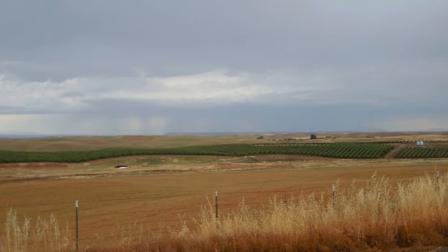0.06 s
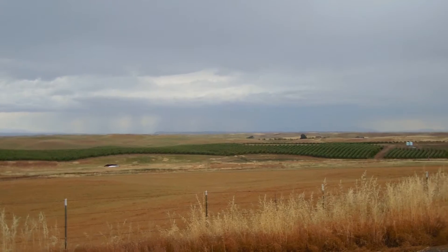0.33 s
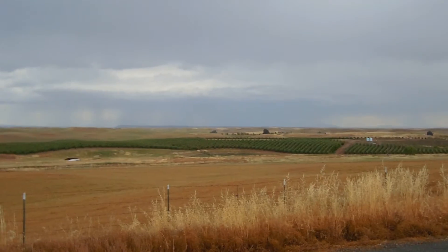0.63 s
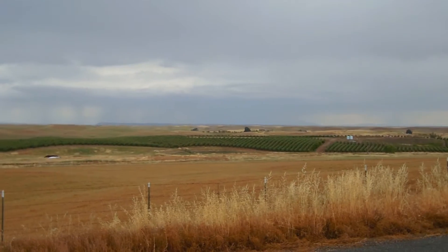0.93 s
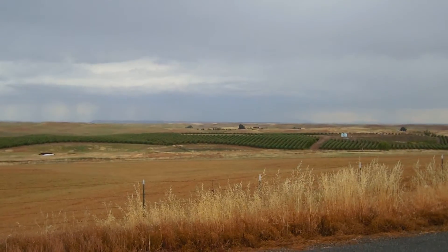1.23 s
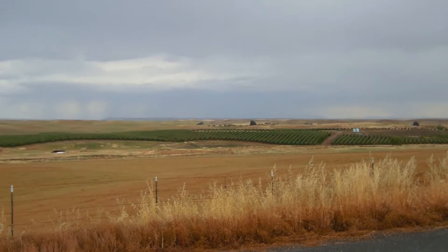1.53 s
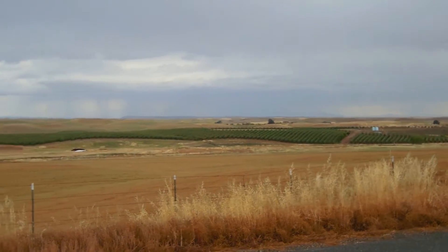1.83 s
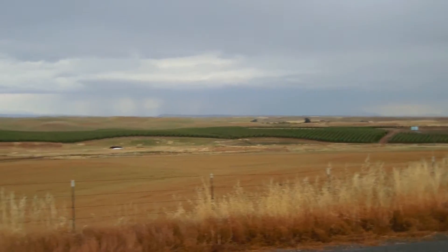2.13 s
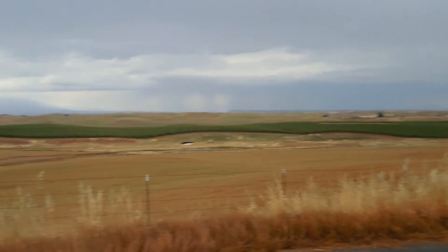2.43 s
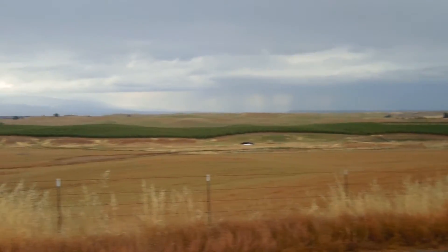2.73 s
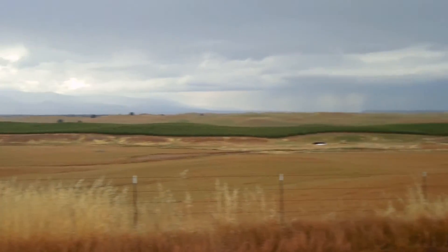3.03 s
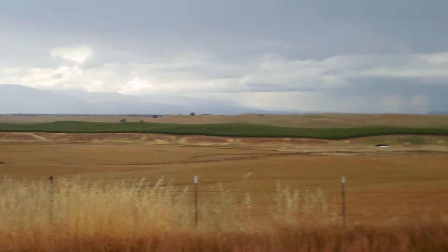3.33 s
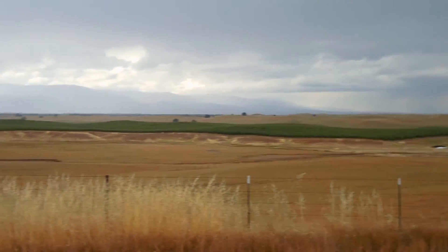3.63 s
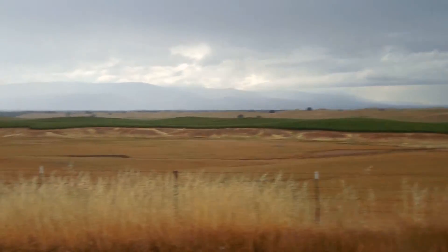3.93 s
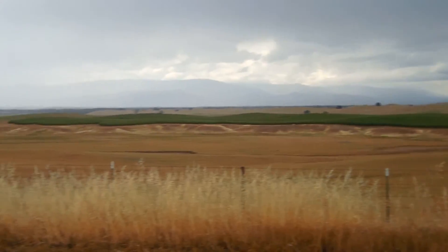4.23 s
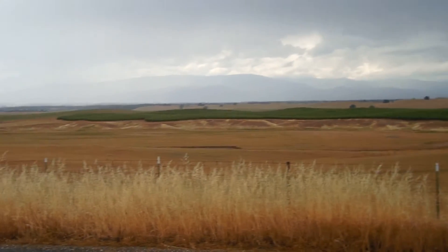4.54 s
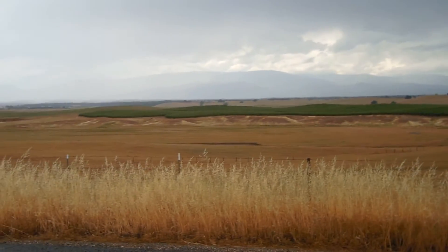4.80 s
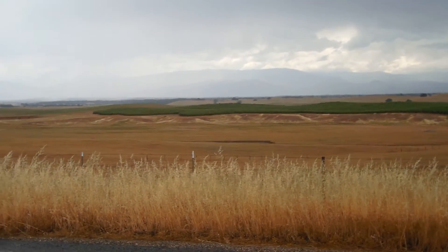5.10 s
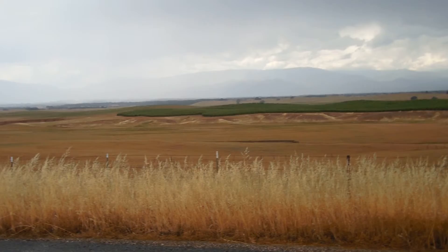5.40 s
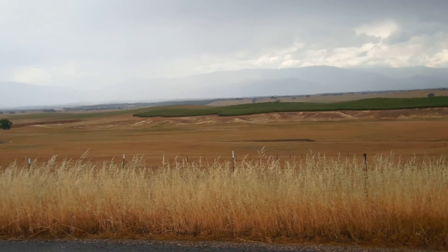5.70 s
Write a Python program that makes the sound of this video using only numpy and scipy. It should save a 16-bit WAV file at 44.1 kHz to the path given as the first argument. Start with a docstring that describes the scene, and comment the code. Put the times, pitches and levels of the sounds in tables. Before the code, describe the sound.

Light wind puffs on the microphone in an open field, strongest at the very start on the right, where dry grass stalks briefly hiss. From about 0.3 to 0.9 seconds a songbird close on the right sings three clear whistles, the last one lower. It runs straight into a fast, gurgling warble of chips and high swoops, ending with a fading whistle at 1.5 to 1.7 seconds. This song is the loudest sound. The hand-held camera gives small, dull clicks on the left at about 0.7, 1.4 and 2.1 seconds, with soft rubbing until 2.8. Grass rustles faintly between 2 and 3 seconds and briefly later. At 3.4 seconds a distant bird answers quietly with two falling whistles, then quick chips from 4 to 4.4 and a very faint call near 5.3. Soft wind, low hiss and a faint camera whir continue throughout.

```python
"""A songbird close on the right sings four pure whistles and a fast, gurgling warble of chips and high
swoops, all tones from the membranes of its syrinx. A far bird answers; the field scatters both songs.
Light wind puffs on the two microphone ports and dry grass rustles. The hand-held camera whirs faintly
and is rubbed and bumped a few times."""
import sys
import numpy as np
from scipy import signal
from scipy.fft import rfft, irfft, next_fast_len
from scipy.io import wavfile
from scipy.ndimage import uniform_filter1d, map_coordinates

SR = 44100
rng = np.random.default_rng(int(sys.argv[2]) if len(sys.argv) > 2 else 0)


def int16_out(signal):
    """Quantize to a 16-bit WAV file."""
    q = np.round(np.clip(np.atleast_2d(signal).T, -1, 1) * 32767)
    wavfile.write(sys.argv[1], SR, q.astype(np.int16))


N = 254016


def amp(db):
    """Decibels to gain."""
    return 10 ** (np.asarray(db) / 20)


def unit_rms(x):
    """Scale to rms 1."""
    return x / np.sqrt(np.mean(x ** 2) + 1e-20)


def log_interp(points, hz):
    """Read (f/Hz, value) points on a log frequency axis."""
    knots_hz, values = np.transpose(points)
    return np.interp(np.log(hz + 1), np.log(knots_hz + 1), values)


def wobble(rate_hz, size=N):
    """Smooth random curve with knots at rate_hz."""
    knots = rng.standard_normal(int(size * rate_hz / SR) + 4)
    return map_coordinates(knots, [np.arange(size) * rate_hz / SR], mode="mirror")


def filtered(x, response):
    """Apply a frequency response."""
    size = next_fast_len(N + 8192)
    return irfft(rfft(x, size) * response(np.fft.rfftfreq(size, 1 / SR)), size)[..., :N]


def noise(density):
    """Noise with amplitude density(hz) per root Hz."""
    return filtered(rng.standard_normal(N) * np.sqrt(SR / 2), density)


def rush(spectrum):
    """Noise of rms 1, coloured by (f/Hz, level/dB) points."""
    return unit_rms(noise(lambda hz: amp(log_interp(spectrum, hz))))


def add(track, start_s, x):
    """Mix x into track at start_s."""
    part = track[..., max(round(start_s * SR), 0):][..., :x.shape[-1]]
    part += x[..., :part.shape[-1]]


def ramp(length_s):
    """Line from 0 to 1."""
    return np.linspace(0, 1, max(round(length_s * SR), 8))


def arch(progress):
    """Half-sine swell."""
    return np.sin(np.pi * progress)


# f/Hz, density/dB re 1 Hz
HISS_SPECTRUM = [(30, -86.5), (450, -92), (900, -91.5), (1700, -87), (2500, -92), (4000, -97),
                 (7500, -101.5), (10000, -106.5), (15000, -112)]


def hiss():
    """Steady noise floor, independent per channel."""
    return np.array([noise(lambda hz: amp(log_interp(HISS_SPECTRUM, hz))) for _ in range(2)])


# f/Hz, nominal width/Hz, left density/dB re 1 Hz, right density/dB re 1 Hz
CASE_MODES = [(866, 304, -81.5, -114), (1408, 51, -75.5, -124), (1765, 190, -83.5, -106.5),
              (2169, 146, -79.5, -103.5), (2627, 210, -88.5, -99.5)]


def camera_whir():
    """Noise in the damped resonances of the case."""
    out = np.zeros((2, N))
    for mode_hz, width_hz, left_db, right_db in CASE_MODES:
        damping_hz = 1.315 * width_hz
        mode = lambda hz: 1j * hz * damping_hz / (mode_hz ** 2 - hz ** 2 + 1j * hz * damping_hz)
        out += amp([[left_db], [right_db]]) * noise(lambda hz: mode(hz) ** 2)
    return out


def friction(strokes, spectrum):
    """Soft, uneven swells of rubbing noise."""
    level = np.zeros((2, N))
    for start_s, length_s, left_db, right_db in strokes:
        add(level, start_s, amp([[left_db], [right_db]]) * arch(ramp(length_s)))
    return level * np.array([rush(spectrum), rush(spectrum)]) * amp(3.8 * wobble(45))


# t/s, length/s, left/dB, right/dB
HAND_STROKES = [(0.69, 0.022, -46.5, -65), (1.77, 1, -54, -85)]
# f/Hz, relative level/dB
HAND_SPECTRUM = [(100, -29), (280, -22.5), (430, -3), (600, -7), (1000, -11), (2500, -5), (9000, -52.5)]


def hand_rub():
    """The hand shifts on the case."""
    return friction(HAND_STROKES, HAND_SPECTRUM)


# t/s, left envelope peak/dB, f/Hz, width/s
CASE_BUMPS = [(0.699, -18.5, 480, 0.001), (1.414, -20, 2400, 0.00023), (2.095, -33.5, 450, 0.00092)]


def camera_bumps(right_gain_db=-18):
    """Dead knocks on the left: the case is pushed once and swings back without ringing."""
    pops = np.zeros(N)
    for centre_s, db, hz, width_s in CASE_BUMPS:
        t = np.arange(N) / SR - centre_s
        pops += amp(db) * np.exp(-(t / width_s) ** 2) * np.sin(2 * np.pi * hz * t)
    return pops * amp([[0], [right_gain_db]])


# one list per sway: t/s, level before pan/dB
STALK_SWAYS = [
    [(0.0, -51), (0.066, -64), (0.114, -48.5), (0.164, -57), (0.19, -73), (0.218, -76), (0.232, -63),
     (0.248, -62), (0.3, -71)],
    [(1.9, -81), (2.142, -57), (2.36, -59.5), (2.462, -53.5), (2.614, -57.5), (2.646, -71), (2.724, -60.5),
     (2.802, -83.5), (2.85, -72)],
]
# t/s, length/s, left/dB, right/dB
RUSTLE_STROKES = [(0.076, 0.087, -55, -59), (2.2, 0.55, -60, -74), (2.67, 0.11, -64.5, -58),
                  (3.696, .26, -57.5, -57.5), (5.32, .13, -58, -57)]
# both: f/Hz, relative level/dB
STALK_SPECTRUM = [(1000, -16.5), (2300, -2), (3300, -9), (4600, -6.5), (6000, -9), (7500, 4), (8300, -1.5),
                  (9500, -15), (14000, -36)]
RUSTLE_SPECTRUM = [(1500, -32), (3000, -6.5), (4000, 2.5), (5200, -3.5), (6300, -7.5), (7800, -8),
                   (10000, -18.5), (15000, -37.5)]


def grass():
    """Dry stalks brush together: a thin hiss close on the right, softer rustles around."""
    level = np.zeros(N)
    for sway in STALK_SWAYS:
        times_s, db = np.transpose(sway)
        t = np.arange(times_s[0], times_s[-1], 1 / SR)
        add(level, times_s[0], amp(np.interp(t, times_s, db)) * signal.windows.tukey(len(t), 0.05))
    pan = amp([[-16], [6]])
    stalks = level * pan * np.array([rush(STALK_SPECTRUM), rush(STALK_SPECTRUM)])
    flicker = amp(0.92 * wobble(75))
    return stalks * flicker + friction(RUSTLE_STROKES, RUSTLE_SPECTRUM)


# both: f/Hz, relative level/dB
BREEZE_SPECTRUM = [(20, -14), (50, 0.5), (120, 2), (180, -1.5), (300, -13), (500, -28.5), (1200, -45),
                   (6000, -110)]
GUST_SPECTRUM = [(40, -19.5), (150, 0), (320, 0), (450, -9.5), (700, -24), (2000, -39), (8000, -100)]


def buffet(force, crossover_db=-41.5, eddy_db=5.5):
    """Eddies push on one microphone port; stronger puffs reach higher in pitch."""
    gust_share = force / (force + amp(crossover_db))
    air = np.sqrt(1 - gust_share) * rush(BREEZE_SPECTRUM) + gust_share * rush(GUST_SPECTRUM)
    eddies = unit_rms(amp(eddy_db * np.tanh(wobble(55))))
    return force * air * eddies


# centre t/s, length/s, left/dB, right/dB
WIND_PUFFS = [ (0.032, .16, -57, -29.5), (0.245, 0.27, -66, -42.5), (0.636, 0.14, -65, -42),
              (1.033, 0.079, -59, -39.5), (1.244, 0.078, -69, -40), (1.676, 0.063, -68.5, -47.5),
              (2.004, 0.43, -62, -47.5), (2.501, 0.11, -59, -51.5), (2.63, .04, -72, -45),
              (3.046, .09, -74, -50), (3.257, 0.19, -70, -58.5), (3.71, 0.043, -51, -68),
              (3.842, 0.074, -47.5, -73), (3.996, 0.11, -58, -56), (4.172, .16, -58, -55.5),
              (4.773, 0.25, -57, -56.5), (4.994, 0.14, -62, -52), (5.202, 0.093, -47.5, -57),
              (5.47, 0.088, -49, -62), (5.593, 0.17, -53, -46.5)]


def wind(breeze_db=(-69, -66), swing_db=2, leak_db=-19):
    """Puffs swell over a light breeze; each port feels a little of the other's eddies."""
    t = np.arange(N) / SR
    force = np.array([amp(db + swing_db * wobble(2.7)) for db in breeze_db])
    for centre_s, length_s, left_db, right_db in WIND_PUFFS:
        swell = 1 / (1 + (2 * (t - centre_s) / length_s) ** 4)
        force = np.maximum(force, amp([[left_db], [right_db]]) * swell)
    ports = np.array([buffet(port) for port in force])
    return ports + amp(leak_db) * ports[::-1]


# f/Hz, T60/s
FIELD_DECAY = [(500, 0.13), (3000, 0.45), (5000, 0.55), (10000, 0.021)]


def field_scatter(x):
    """Grass and ground scatter a short, diffuse tail."""
    hz, t, spectra = signal.stft(rng.standard_normal((2, SR // 2)), SR, nperseg=256)
    decay = amp(-60 * t / log_interp(FIELD_DECAY, hz)[:, None])
    _, tail = signal.istft(spectra * decay, SR, nperseg=256)
    return signal.fftconvolve(x[None], tail / np.linalg.norm(tail[0]), axes=1)[:, :N]


def from_right(x, shadow_db, lag_ms):
    """The left port hears the sound later, its treble shaded by the camera body."""
    shade = lambda hz: amp(shadow_db * hz ** 2 / (hz ** 2 + 1500 ** 2))
    delay = lambda hz: np.exp(-2j * np.pi * hz * lag_ms / 1000)
    return np.array([filtered(x, lambda hz: shade(hz) * delay(hz)), x])


def syrinx(pitch_hz, overtones_db):
    """Nearly pure tone; overtones grow as the membrane tightens and fade in the top treble."""
    phase = 2 * np.pi * np.cumsum(pitch_hz) / SR
    tension = np.minimum(pitch_hz / 4000, 1) ** 2.5
    overtones = sum(amp(db) * np.sin(k * phase) / (1 + (k * pitch_hz / 12000) ** 12)
                    for k, db in enumerate(overtones_db, 2))
    return np.sqrt(2) * (np.sin(phase) + tension * overtones)


def whistles(notes, sag=0.012, waver=0.002):
    """Clean sliding notes: pressure rises, holds and falls; low pressure flattens the pitch."""
    out = np.zeros(N)
    for start_s, length_s, hz, slide_hz_per_s, db, attack_s, release_s in notes:
        t = np.arange(round(length_s * SR)) / SR
        rise = np.sin(np.pi / 2 * np.minimum(t / attack_s, 1))
        fall = np.sin(np.pi / 2 * np.minimum((length_s - t) / release_s, 1))
        pressure = (rise * fall) ** 2
        bend = 1 - sag * (1 - pressure) + waver * wobble(120, len(t))
        pitch_hz = (hz + slide_hz_per_s * t) * bend
        level = pressure * amp(db + 0.34 * wobble(64, len(t)))
        add(out, start_s, level * syrinx(pitch_hz, overtones_db=(-45, -38, -46)))
    return out


def chips(rows):
    """Warble notes that glide straight between two pitches."""
    return [(start_s, first_hz + (last_hz - first_hz) * ramp(length_s), db, flutter)
            for start_s, length_s, first_hz, last_hz, db, flutter in rows]


def warble(notes, flutter_hz, jitter, hoarse_db):
    """Quick slurred notes, some fluttering; a rough noise riding on the tones adds sidebands."""
    out = np.zeros(N)
    for start_s, glide_hz, db, flutter in notes:
        length_s = len(glide_hz) / SR
        progress = ramp(length_s)
        pitch_hz = glide_hz * (1 + jitter * wobble(700, len(progress)))
        dips = np.sin(np.pi * flutter_hz * length_s * (progress - 0.5)) ** 2
        level = amp(db) * arch(progress) * (1 - np.clip(flutter, 0, 1) * dips)
        purity_db = 0.45 * np.maximum(db + 27, 0)  # loudest notes are purest
        tone = syrinx(pitch_hz, overtones_db=(-16 - purity_db, -21 - purity_db, -27 - purity_db))
        add(out, start_s, level * tone)
    roughness = rush([(100, 0), (1200, -4), (3000, -7), (5500, -19), (9000, -50)])
    return out * (1 + amp(hoarse_db) * roughness)


# t/s, length/s, f/Hz, slide/(Hz/s), level/dB, attack/s, release/s
ANSWER_WHISTLES = [(3.425, 0.175, 2186, -1350, -38, 0.11, 0.02),
                   (3.82, .16, 1653, -1150, -51.5, 0.04, 0.083)]
# t/s, length/s, first f/Hz, last f/Hz, level before low-pass/dB, flutter depth
ANSWER_CHIPS = [ (4.015, 0.043, 2540, 2340, -42, 0.5), (4.056, .02, 1900, 1910, -35, 0),
                (4.078, 0.027, 3700, 3640, -36, 0), (4.101, 0.018, 3530, 3250, -26.5, 0.5),
                (4.115, 0.0216, 3300, 2680, -27.5, .6), (4.138, 0.016, 3000, 2850, -31.5, 0),
                (4.156, 0.015, 2140, 1980, -35, 0.1), (4.171, 0.019, 2260, 2280, -37.5, 0),
                (4.305, 0.022, 1890, 1990, -36, 0), (4.332, 0.022, 3890, 3750, -38.5, 0),
                (4.359, 0.012, 3000, 2860, -32.5, 0), (4.374, 0.014, 3900, 2970, -43, 0.9),
                (5.335, 0.041, 4400, 4100, -52, 0.7), (5.414, .009, 4700, 3400, -42, .2)]


def far_bird(cutoff_hz=4800):
    """Two falling whistles, then chips; distance takes off the overtones."""
    song = whistles(ANSWER_WHISTLES)
    song += warble(chips(ANSWER_CHIPS), flutter_hz=194, jitter=0.011, hoarse_db=-42)
    return filtered(song, lambda hz: 1 / (1 + (hz / cutoff_hz) ** 7))


# f/Hz, relative level/dB
RASP_SPECTRUM = [(2000, -22), (4500, -1), (6500, 0), (8500, -6), (12000, -13), (15000, -34)]


def rasp(voice):
    """A faint, high fizz that follows the warble's high notes."""
    treble = filtered(voice, lambda hz: hz ** 8 / (hz ** 8 + 3000 ** 8))
    envelope = np.abs(uniform_filter1d(treble ** 2, size=180)) ** 0.35
    return amp(-32 + 3 * wobble(300)) * envelope * rush(RASP_SPECTRUM)


# t/s, rise/s, fall/s, top f/Hz, level before thinning/dB
SONG_SWOOPS = [(1.074, .009, 0.023, 5475, -11), (1.171, 0.016, 0.021, 6530, -20),
               (1.443, .021, .022, 6900, -15.5)]


def swoops(foot_hz=2504, thinning_db=6.5, tremor_db=2, flutter=0.56):
    """Trembling warble notes that shoot up from one pitch, weaken at the top and drop back."""
    notes = []
    for start_s, rise_s, fall_s, top_hz, db in SONG_SWOOPS:
        height = 1 - np.concatenate([1 - ramp(rise_s), ramp(fall_s)]) ** 2
        glide_hz = foot_hz + (top_hz - foot_hz) * height
        level_db = db - thinning_db * height + tremor_db * wobble(352, len(height))
        notes.append((start_s, glide_hz, level_db, flutter))
    return notes


# t/s, length/s, f/Hz, slide/(Hz/s), level/dB, attack/s, release/s
SONG_WHISTLES = [ (.326, 0.053, 4086, -4000, -15, 0.026, 0.039),
                 (.448, .16, 3915, -85.5, -16.5, 0.085, 0.045), (.742, 0.16, 3043, -280, -14, 0.032, 0.024),
                 (1.505, .18, 2970, -340, -23, 0.0085, .14)]
# t/s, length/s, first f/Hz, last f/Hz, level/dB, flutter depth
SONG_CHIPS = [ (.963, 0.027, 2654, 2304, -18, 0.77), (.988, 0.025, 2230, 2090, -28, 0.2),
              (1.014, .026, 2663, 2930, -18, 0.8), (1.034, .018, 4275, 4080, -11, 0.2),
              (1.052, 0.0085, 4540, 3830, -17, 0.08), (1.055, 0.015, 3163, 3070, -23, 0),
              (1.068, .012, 4900, 4440, -26, .1), (1.096, .022, 4620, 3636, -9.5, .65),
              (1.199, 0.027, 4285, 3640, -11, .5), (1.226, .012, 2976, 2940, -17, 0.05),
              (1.237, .015, 3160, 2770, -20, 1.1), (1.252, .012, 4580, 4040, -9.5, 0.3),
              (1.264, .006, 4400, 3334, -15.5, 0.08), (1.317, 0.044, 2070, 1970, -28, 0.34),
              (1.356, 0.014, 2060, 1270, -36, 0.06), (1.393, .03, 1000, 1160, -42.5, 0.05),
              (1.415, .02, 2397, 2466, -24.5, 0.4), (1.432, 0.017, 4580, 4080, -20.5, 0.08),
              (1.474, 0.014, 4670, 3930, -21, 0.4), (1.487, 0.016, 3944, 3540, -22, .1)]


def near_bird():
    """Three whistles, a slightly hoarse warble and a closing whistle."""
    gurgle = warble(chips(SONG_CHIPS) + swoops(), flutter_hz=224.5, jitter=0.016, hoarse_db=-26)
    return whistles(SONG_WHISTLES) + gurgle + rasp(gurgle)


def scene():
    """Two birds and their scatter over wind, grass, hiss and camera sounds."""
    near, far = near_bird(), far_bird()
    direct = from_right(near, shadow_db=-23.5, lag_ms=0.15) + from_right(far, shadow_db=-15, lag_ms=0.2)
    scatter = amp([[-34], [-28.5]]) * field_scatter(near + amp(-4) * far)
    return direct + scatter + wind() + grass() + hiss() + camera_whir() + camera_bumps() + hand_rub()


def record(dry, band_limit_hz=15740):
    """The camera keeps nothing above its band limit."""
    return filtered(dry, lambda hz: hz < band_limit_hz)


dry = scene()
out = record(dry)
int16_out(out)
```